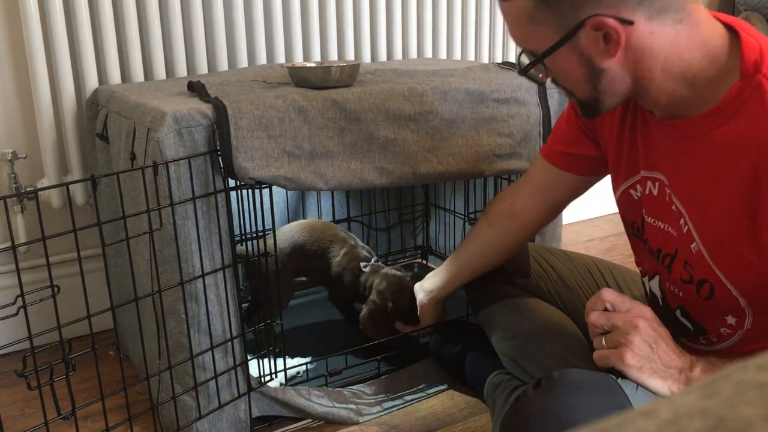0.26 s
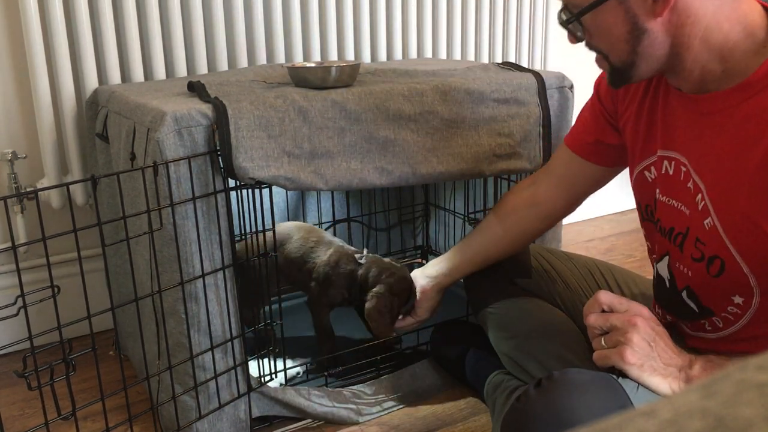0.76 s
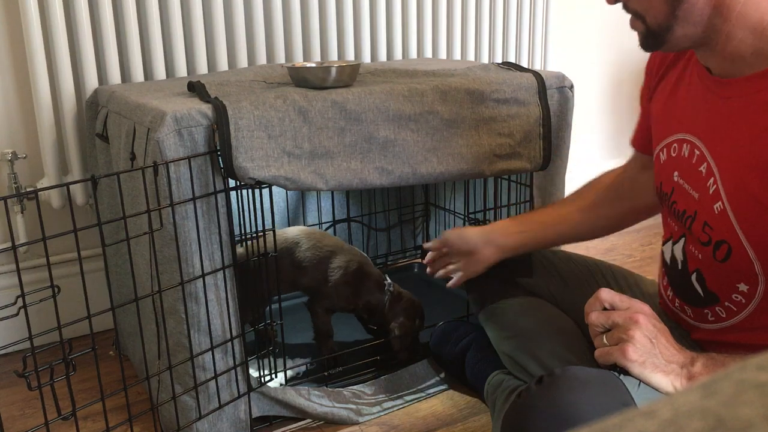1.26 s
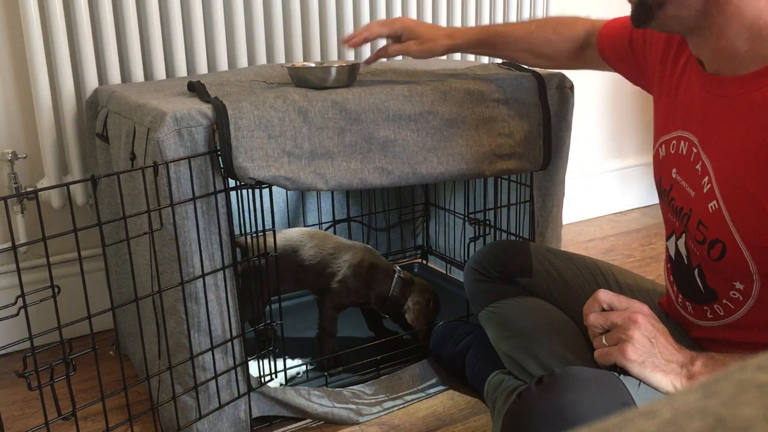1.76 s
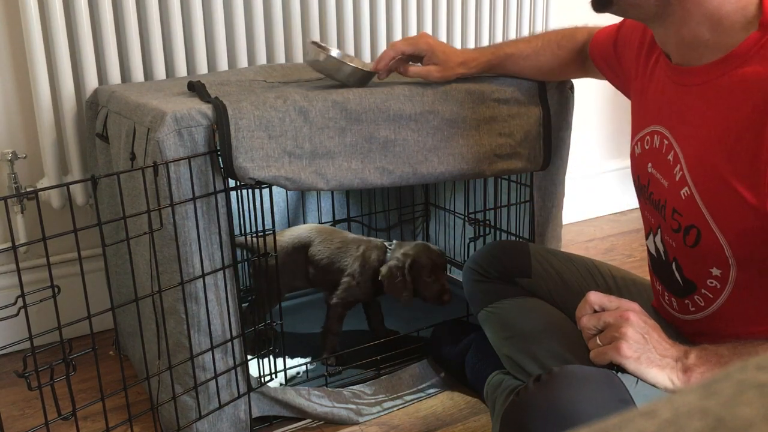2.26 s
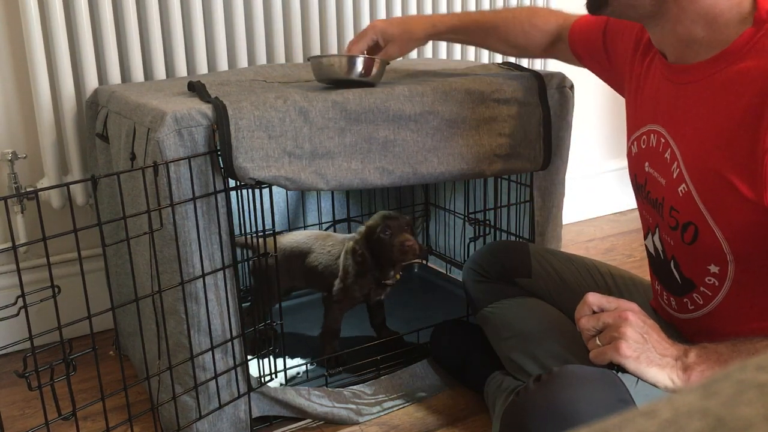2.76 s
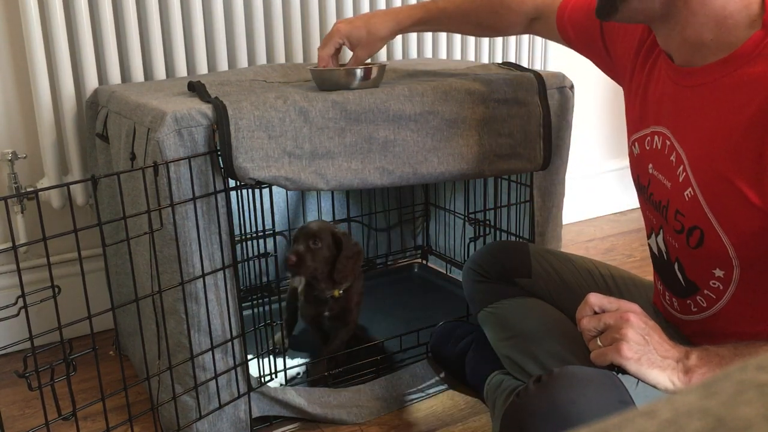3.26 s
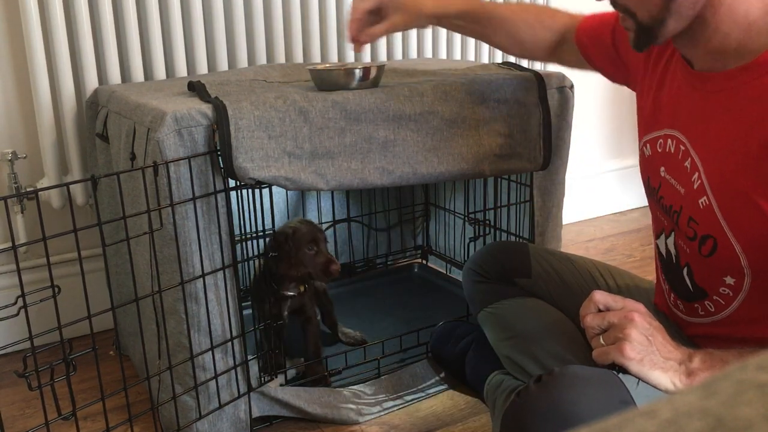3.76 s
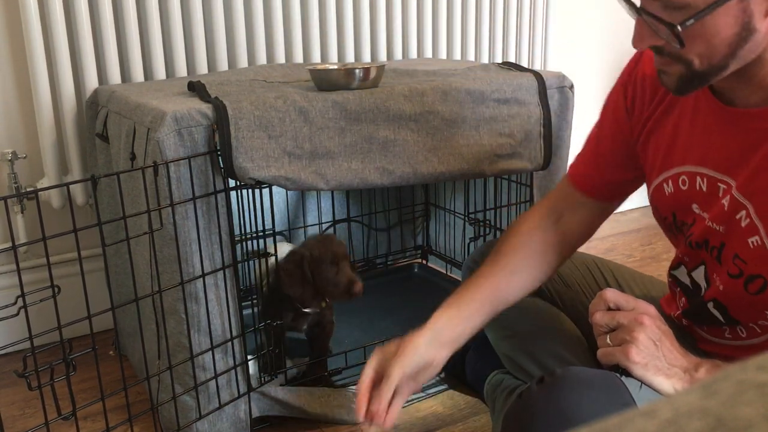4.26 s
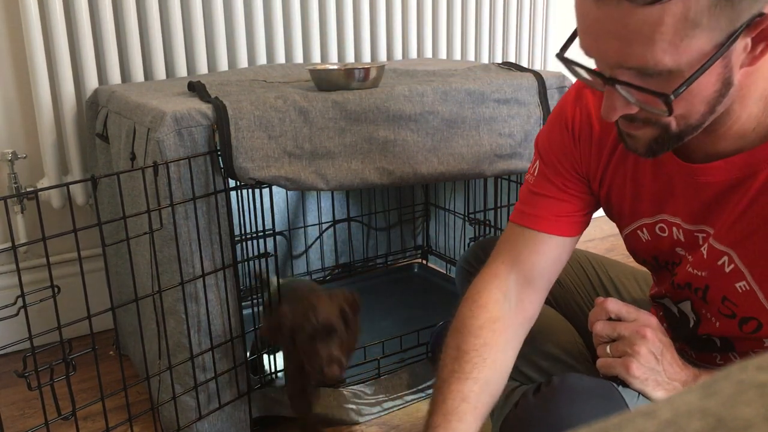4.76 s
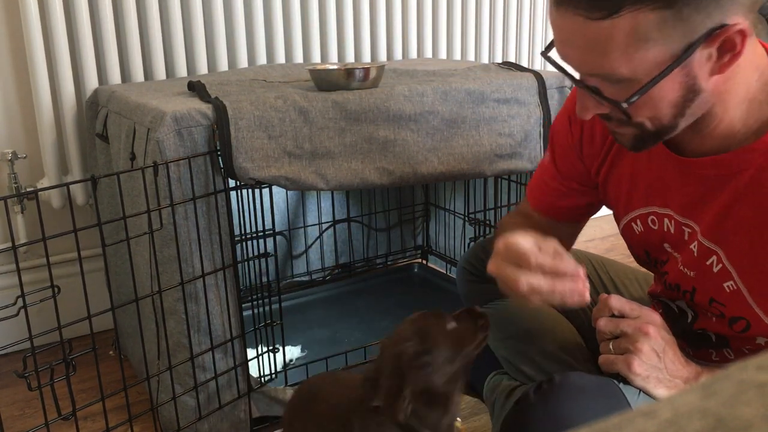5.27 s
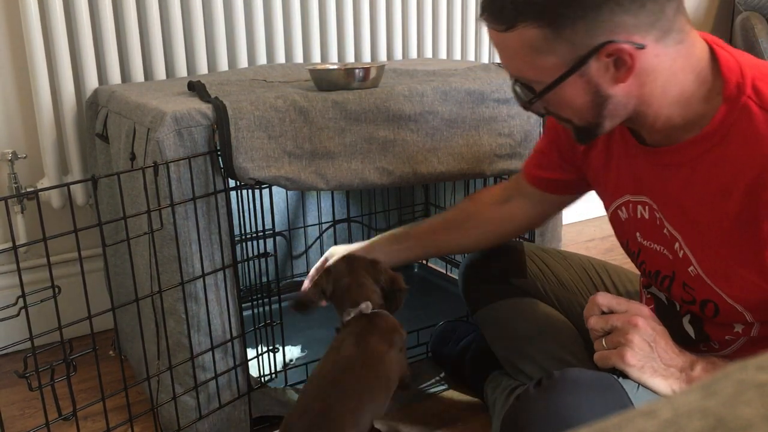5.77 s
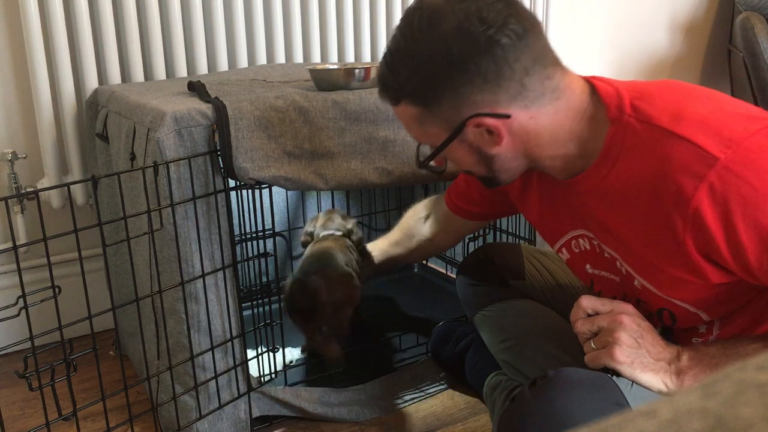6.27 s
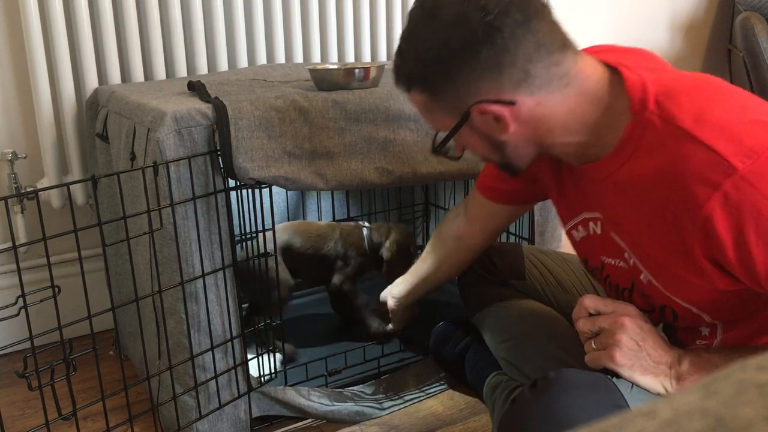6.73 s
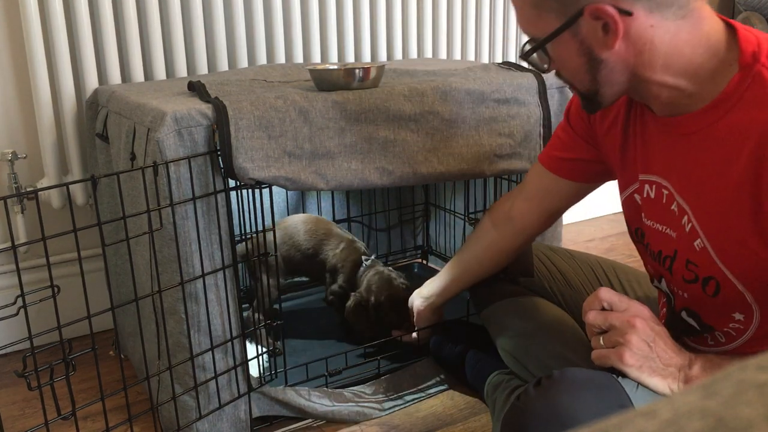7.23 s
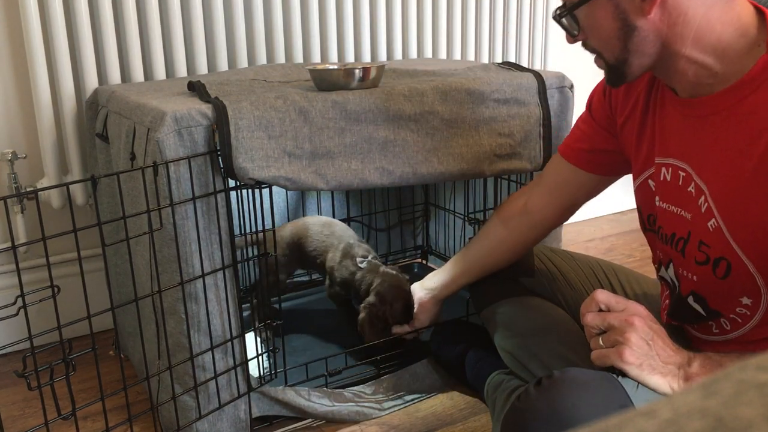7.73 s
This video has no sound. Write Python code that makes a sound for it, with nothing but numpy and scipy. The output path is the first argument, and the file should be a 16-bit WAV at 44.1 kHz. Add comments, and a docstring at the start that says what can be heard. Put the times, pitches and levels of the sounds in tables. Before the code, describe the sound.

A close microphone in a small, hard-surfaced room picks up quiet, low-weighted room noise and a faint wavering hum. Slight paw movement and a tick lead to a piercing clicker press at 0.37 s and its release at 0.56 s, bright and metallic with a short room tail. From 1 to 3.6 s things are sparse: soft paw thuds, a tiny steel bowl tap at 1.96 s, a fainter one at 2.45 s, light rustling. Around 3.9 to 4.8 s crisp claw ticks cluster with thin collar and wire pings. At 5.0 to 5.1 s paws thump and slide on the plastic tray with a tag tinkle; more ticks follow. The busiest scuffle, hollow knocks and scraping, runs 6.1 to 6.8 s, then eases to light shuffling. The clicker snaps again at 7.51 and 7.67 s, far louder than everything else, and a faint paw fall comes at 7.93 s.

```python
"""Training clicker and crated puppy

A hand-held clicker is pressed and let go twice in a small hard room: one impulse per snap rings the tongue.
Paws and claws push the plastic tray of a crate with noise bursts; slides, cloth and brushing are gated slips.
Collar tag and wire ping as decaying sines, finger taps ring a steel bowl; hum and shaped noise lie below."""
import sys
import numpy as np
from scipy import signal
from scipy.fft import rfft, irfft
from scipy.io import wavfile
from scipy.ndimage import uniform_filter1d

SR = 44100
rng = np.random.default_rng(int(sys.argv[2]) if len(sys.argv) > 2 else 0)


def generate_wav(sig):
    """Save sig (samples, or channels by samples) to the path in sys.argv[1] as 16-bit PCM at SR."""
    pcm = np.round(np.clip(np.atleast_2d(sig).T, -1, 1) * 32767).astype(np.int16)
    wavfile.write(sys.argv[1], SR, pcm)


N = 352800  # 8 s

# Background noise spectrum: f/Hz, relative density/dB
AIR_SPECTRUM = [(15, -51), (25, -19), (108, -1.5), (153, -7), (373, -16.5), (439, -14.5), (887, -25),
                (1130, -25.5), (2550, -35), (4250, -31.5), (5000, -36.5), (6380, -33), (10400, -38.5),
                (11600, -34), (16000, -50)]
# Reverberation time: f/Hz, T60/s
ROOM_T60 = [(250, 0.79), (1000, 0.5), (2000, 0.41), (4000, 0.29), (8000, 0.32), (14000, 0.14)]
# Reflections off nearby floor and walls: delay/ms, level/dB
ECHOES = [(2.3, -11), (3.6, -6), (6.8, -13), (11.2, -7), (16, -16.5)]

# Body modes, all: f/Hz, width/Hz, relative level/dB
# clicker tongue buckling in, then springing back
PRESS_MODES = [(1580, 210, -12.5), (3200, 310, -4.5), (3660, 490, 0.5), (4220, 390, 4.5), (5000, 500, -28),
               (6243, 400, -13), (6840, 830, -7), (8080, 480, -8), (9550, 600, -26), (11800, 420, -28.5),
               (12570, 910, -26.5), (16400, 700, -29)]
RELEASE_MODES = [(1714, 210, -8.5), (2430, 680, -15), (3270, 355, 3), (3493, 720, -3), (4160, 450, -5.5),
                 (6040, 365, -2), (6670, 700, -8), (7410, 210, -13.5), (7840, 440, -27.5),
                 (9250, 260, -6.5), (10970, 320, -14.5), (12580, 98, -6), (14700, 1100, -20),
                 (16100, 500, -29)]
# tray: low boom, higher drumming
TRAY_BOOM_MODES = [(191, 50, 2), (229.2, 30, 0), (273, 21, 1), (377.8, 49, -8)]
TRAY_DRUM_MODES = [(560, 390, -6), (744, 57, 0), (897, 33, -3), (1110, 120, 0), (1240, 190, -4.5),
                   (1544, 200, -6), (1984, 230, -8.5)]
# claws on the tray
CLAW_MODES = [(2013, 450, 2.5), (2970, 330, 3), (3770, 2900, -1.5)]
# collar metal
COLLAR_MODES = [(9340, 540, -1), (12510, 670, -6), (11100, 6400, -9.5)]
# cloth and fur weave
CLOTH_MODES = [(6640, 3000, -4), (9560, 1300, 0.5), (13390, 3800, -7.5)]
# metal brushed by fingers and fur
BRUSHED_MODES = [(3250, 560, 6), (6300, 2600, 0.5)]
# steel food bowl
BOWL_MODES = [(4940, 25, 2), (6350, 25, -0.5), (7650, 30, -6), (8800, 30, 1)]

# Paws sliding on the tray: t/s at full strength, hold/s, boom level/dB, brightness/dB
SLIDES = [(0.0, 0.03, -60.5, 5), (0.344, 0.021, -59.5, 6.5), (1.399, 0.16, -69.5, -6.5),
          (2.015, 0.025, -46.5, -11), (2.909, 0.047, -53, -3.5), (3.134, 0.09, -62.5, -3),
          (3.4, 0.037, -55, -5), (3.7, 0.094, -70, -6), (4.274, 0.095, -63.5, -10.5),
          (4.54, 0.036, -55.5, 1), (4.794, 0.034, -52, -3.5), (5.037, 0.065, -38.5, -5),
          (5.607, 0.031, -67.5, 8), (6.13, 0.27, -45.5, 1.5), (6.26, .02, -49, 6),
          (6.308, 0.022, -40.5, -0.5), (6.544, .03, -60, -11), (6.66, 0.018, -46, -0.5),
          (6.763, 0.13, -58, 2.5), (7.125, 0.08, -60, -1), (7.37, 0.26, -63, 1.5)]
# Cloth and fur rustles: t/s at full strength, hold/s, level/dB
RUSTLES = [(0.0, 0.15, -62), (0.295, 0.15, -64), (1.23, .1, -67), (1.797, 0.047, -73.5),
           (2.45, 0.092, -76.5), (2.916, 0.035, -71), (3.593, 0.061, -72), (4.11, .04, -72),
           (4.45, 0.038, -70), (4.8, 0.02, -60.5), (5.058, 0.022, -44.5), (5.63, 0.12, -73),
           (6.132, 0.013, -50), (6.347, 0.07, -55), (6.75, 0.08, -62), (6.989, .05, -57.5),
           (7.3, 0.19, -67.5)]
# Brushing along metal: t/s at full strength, hold/s, level/dB
BRUSHES = [(3.605, 0.047, -62), (5.87, 0.034, -59.5)]
# Thin pings of collar tag and crate wire: t/s, f/Hz, nominal level/dB, T60/s
PINGS = [(3.903, 9340, -62, 0.079), (4.156, 9580, -51, 0.087), (4.156, 12600, -55, 0.12),
         (4.288, 9060, -47, 0.04), (4.289, 6280, -42, 0.038), (5.04, 8550, -39, 0.19),
         (5.535, 10000, -53, 0.16), (5.664, 4750, -61, 0.26), (6.491, 11850, -57, 0.29)]
# Finger taps on the bowl: t/s, peak level/dB before the paw gains
BOWL_TAPS = [(1.9604, -47.5), (2.455, -60)]
# Bright claw and finger ticks: t/s, claw level/dB, claw f/Hz, knock level/dB, collar level/dB
TICKS = [(0.3225, -34, 6400, -35.5, -38.5), (1.9604, -48, 6360, -42.5, -49.5),
         (2.2187, -60.5, 6210, -71.5, -48.5), (2.942, -62, 6500, -70, -46), (3.141, -44.5, 6970, -45, -48),
         (3.495, -60, 6040, -70, -60), (3.901, -38, 6600, -43.5, -44), (4.002, -49.5, 6240, -75, -53),
         (4.0227, -29.5, 6600, -36, -45), (4.154, -37, 6940, -39.5, -47), (4.275, -49.5, 6900, -64, -52),
         (4.288, -48, 6600, -40.5, -61), (4.4206, -41, 3050, -45.5, -43.5), (4.573, -34.5, 6200, -44, -53),
         (4.7108, -28.5, 6360, -37.5, -45), (4.7605, -34.5, 3870, -37, -55), (5.1392, -31, 7300, -41, -39),
         (5.497, -54, 6250, -69, -58), (5.619, -46.5, 6050, -63.5, -53), (5.5339, -38, 3230, -42, -37),
         (5.6644, -38.5, 5500, -44, -48), (5.8007, -42.5, 6900, -60, -48), (5.9264, -51, 6200, -79, -47),
         (5.95, -50, 6500, -59, -51), (6.0774, -35, 6730, -31.5, -52), (6.1152, -37.5, 6400, -48, -34)]
# Time constants of a tick: rise/ms, claw decay/ms, tray decay/ms
TICK_MS = (1.8, 5.07, 8.2)
# Duller paw falls loading the tray: t/s, claw level/dB, thud level/dB, knock level/dB, knock f/Hz
PAWFALLS = [(0.175, -44.5, -43, -43, 920), (1.1413, -53.5, -58, -61, 350), (2.032, -59, -50, -54, 490),
            (2.7603, -53.5, -39, -47.5, 355), (2.9046, -43.5, -48, -51, 780),
            (2.9491, -55, -43.5, -50, 380), (3.1033, -50, -63.5, -46, 920), (3.3541, -52, -44, -51, 1156),
            (3.457, -77, -47, -63, 356), (3.5926, -48, -62, -50, 413), (4.4446, -48, -65, -52, 590),
            (4.9805, -37.5, -35, -36, 895), (5.0306, -36.5, -34.5, -37, 345), (5.137, -45, -25, -38, 353),
            (5.44, -53.5, -40.5, -38.5, 370), (5.6192, -52, -41, -44, 460), (5.808, -59, -39, -39, 530),
            (6.2202, -34.5, -48, -62, 590), (6.2583, -44, -34.5, -31.5, 1140),
            (6.2965, -27, -25, -23, 1180), (6.4497, -38, -41.5, -30, 779), (6.4827, -40, -32, -38, 900),
            (6.6127, -28, -30.5, -24, 820), (6.6393, -53, -33, -26.5, 930),
            (7.061, -49.5, -41, -43.5, 1043), (7.414, -49, -50, -49.5, 1010), (7.929, -49, -46, -46.5, 689)]
# Time constants of a paw fall: rise/ms, claw decay/ms, tray decay/ms
PAW_MS = (1.7, 7, 16.3)
# Clicker snaps, press and release in turn: t/s, direct peak level/dB, pitch factor set by the grip
SNAPS = [(0.3680, -3.5, 1), (0.5613, -6, 1.005), (7.5054, -3.5, 1.013), (7.6704, -6, 1.017)]

AIR_DB, AIR_SWELL_DB = -58, 1.1
HUM_HZ, HUM_WANDER_HZ, HUM_DB, HUM_WAVER_DB = 98, 1.5, -62.5, 3
DEEP_HZ, DEEP_DB = 56.7, -64  # low room mode
MID_HZ, MID_DB = 289.7, -69.5  # higher room mode

DRUM_DB, SCRAPE_DB = -1, -7  # re boom, before brightness
SLIDE_RISE_DB_S, SLIDE_FALL_DB_S = 260, 89.5
RUSTLE_RISE_DB_S, RUSTLE_FALL_DB_S = 260, 95
BRUSH_RISE_DB_S = 400

TICK_KNOCK_HZ, TICK_THUD_DB = 597, -7.5  # thud re knock
PAW_CLAW_HZ, PAW_COLLAR_DB = 1800, -20.5  # collar re claw
PAW_DRY_DB, PAW_ROOM_DB = -7.5, -8.5  # paws past the room, paws into the room

ROOM_DB, ROOM_BUILD_MS = -1, 1.6  # tail energy, build-up
NEAR_DB, NEAR_MS = -4, 4  # scatter off hand, crate and floor
HALL_DB, HALL_STRETCH = -17.5, 3.4  # slower tail of the adjoining space, re room tail
LOW_CUT_HZ, TOP_HZ = 42, 16000


def undb(db):
    """Amplitude factor of a level in dB."""
    return 10 ** (np.asarray(db) / 20)


def unit(x):
    """Scale to rms 1."""
    return x / np.sqrt(np.mean(x ** 2))


def walk(rate_hz):
    """Random levels held 1 / rate_hz, smoothed twice; spread near 1."""
    hold = int(SR / rate_hz)
    steps = np.repeat(rng.standard_normal(N // hold + 1), hold)
    return 1.5 * uniform_filter1d(uniform_filter1d(steps, hold), hold)[:N]


def body(modes):
    """Impulse response of damped modes, energy 1; neighbours swing in opposite sense."""
    t = np.arange(SR // 10) / SR
    h = np.zeros(len(t))
    for k, (hz, width_hz, db) in enumerate(modes):
        decay = np.exp(-np.pi * width_hz * t)
        h += (-1) ** k * undb(db) * width_hz / hz * decay * np.sin(2 * np.pi * hz * t)
    h = np.diff(h, prepend=0)  # small bodies radiate by their motion: little below the modes
    return h / np.sqrt(np.sum(h ** 2))


def ring(force, modes):
    """Drive a body with a force."""
    return signal.fftconvolve(force, body(modes))[:N]


def grains(scatter_db, rate_hz):
    """Noise broken into little slips of uneven size."""
    return unit(rng.standard_normal(N) * undb(scatter_db * walk(rate_hz)))


def swell(s, hold_s, db, rise_db_s, fall_db_s):
    """Strength of overlapping strokes: each rises, holds and dies away; their powers add."""
    t = np.arange(0, N, 64) / SR
    late = t[:, None] - s
    down_db = rise_db_s * np.maximum(-late, 0) + fall_db_s * np.maximum(late - hold_s, 0)
    strength = np.sqrt(np.sum(undb(db - down_db) ** 2, axis=1))
    return np.interp(np.arange(N) / SR, t, strength)


def push(rise_ms, fall_ms):
    """Force envelope of one contact: exponential rise and decay."""
    ms = np.arange(SR // 6) / SR * 1000
    return (1 - np.exp(-ms / rise_ms)) * np.exp(-ms / fall_ms)


def air():
    """Gently swelling shaped noise, two noise-driven room modes and a wavering mains hum."""
    hz = np.maximum(np.arange(N // 2 + 1) * SR / N, 1)
    table_hz, table_db = np.array(AIR_SPECTRUM).T
    shape = undb(np.interp(np.log(hz), np.log(table_hz), table_db))
    noise = unit(irfft(rfft(rng.standard_normal(N)) * shape, N))
    rumble = noise * undb(AIR_DB + AIR_SWELL_DB * walk(5.3))
    hum_phase = 2 * np.pi * np.cumsum(HUM_HZ + HUM_WANDER_HZ * walk(1.8)) / SR
    hum = np.sqrt(2) * np.sin(hum_phase) * undb(HUM_DB + HUM_WAVER_DB * walk(5.4))
    deep = ring(rng.standard_normal(N), [(DEEP_HZ, 15, 0)]) * undb(DEEP_DB)
    mid = ring(rng.standard_normal(N), [(MID_HZ, 30, 0)]) * undb(MID_DB)
    return rumble + deep + mid + hum


def scuffle():
    """Sliding paws, cloth and brushing: uneven slips drive tray, claws, weave and metal."""
    s, hold_s, boom_db, bright_db = np.array(SLIDES).T

    def slide(db):
        return swell(s, hold_s, db, SLIDE_RISE_DB_S, SLIDE_FALL_DB_S)

    rustle = swell(*np.array(RUSTLES).T, RUSTLE_RISE_DB_S, RUSTLE_FALL_DB_S)
    brush = swell(*np.array(BRUSHES).T, BRUSH_RISE_DB_S, RUSTLE_FALL_DB_S)
    out = ring(slide(boom_db) * grains(2.5, 30), TRAY_BOOM_MODES)
    out += ring(slide(boom_db + DRUM_DB + bright_db) * grains(2.5, 60), TRAY_DRUM_MODES)
    out += ring(slide(boom_db + SCRAPE_DB + bright_db) * grains(3, 80), CLAW_MODES)
    out += ring(rustle * grains(3.5, 90), CLOTH_MODES)
    out += ring(brush * grains(2, 90), BRUSHED_MODES)
    return out


def pings():
    """Single lightly damped modes, each struck once."""
    out, t = np.zeros(N), np.arange(SR // 2) / SR
    for s, hz, db, t60_s in PINGS:
        envelope = np.exp(-np.log(1000) * t / t60_s) * (1 - np.exp(-t / 0.0011))
        i = int(s * SR)
        out[i:i + len(t)] += undb(db) * envelope * np.sin(2 * np.pi * hz * t)
    return out * undb(1.6 * walk(150))  # loose metal keeps touching its neighbours: flutter


def bowl():
    """Impulsive finger taps ring the steel bowl."""
    taps, peak = np.zeros(N), np.max(np.abs(body(BOWL_MODES)))
    for s, db in BOWL_TAPS:
        taps[int(s * SR)] = undb(db) / peak
    return ring(taps, BOWL_MODES)


def contacts():
    """A rough push ticks a claw and shakes the collar; the loose tray thuds and rattles on for longer."""
    out = np.zeros(N + SR)
    boom, collar = body(TRAY_BOOM_MODES), body(COLLAR_MODES)
    rows = []
    for s, claw_db, claw_hz, knock_db, collar_db in TICKS:
        thud_db = knock_db + TICK_THUD_DB
        rows.append((s, claw_db, claw_hz, thud_db, knock_db, TICK_KNOCK_HZ, collar_db, *TICK_MS))
    for s, claw_db, thud_db, knock_db, knock_hz in PAWFALLS:
        collar_db = claw_db + PAW_COLLAR_DB
        rows.append((s, claw_db, PAW_CLAW_HZ, thud_db, knock_db, knock_hz, collar_db, *PAW_MS))
    for s, claw_db, claw_hz, thud_db, knock_db, knock_hz, collar_db, rise_ms, tick_ms, tray_ms in rows:
        rattle = push(2.9 * rise_ms, tray_ms)
        drag = undb(-16) * push(12.0, 3 * tray_ms)  # faint scrape as the contact drags on
        tick = push(rise_ms, tick_ms) + drag
        knock = body([(knock_hz, 0.44 * knock_hz, 0), (1.304 * knock_hz, 0.87 * knock_hz, -4)])
        claw = body([(claw_hz, 0.21 * claw_hz, 0), (3000, 4000, -7)])
        gains = undb([[thud_db], [knock_db], [claw_db], [collar_db]])
        force = np.array([rattle, rattle, tick, tick]) * gains
        force = force * rng.standard_normal(force.shape)
        bodies = np.array([boom, knock, claw, collar])
        sound = signal.fftconvolve(force, bodies, axes=1).sum(axis=0)
        i = int(s * SR)
        out[i:i + len(sound)] += sound
    return out[:N]


def clicker():
    """Each snap is one sharp force on the tongue; press and release ring different modes."""
    out = np.zeros(N)
    for k, (s, db, pitch) in enumerate(SNAPS):
        modes = (PRESS_MODES, RELEASE_MODES)[k % 2]
        h = body([(hz * pitch, width_hz, mode_db) for hz, width_hz, mode_db in modes])
        i = int(s * SR)
        out[i:i + len(h)] += undb(db) * h / np.max(np.abs(h))
    return out


def room(x):
    """Direct sound, close scatter, distinct echoes and a dense tail with frequency-dependent decay."""
    t = np.arange(SR) / SR
    tail = np.zeros(len(t))
    edges_hz = 125 * 2 ** np.arange(0, 7.6, .5)  # half octaves
    table_hz, table_s = np.array(ROOM_T60).T
    for lo, hi in zip(edges_hz[:-1], edges_hz[1:]):
        t60_s = np.interp(np.log(lo * hi) / 2, np.log(table_hz), table_s)
        sos = signal.butter(2, [lo, min(hi, 20000)], "bandpass", fs=SR, output="sos")
        band = signal.sosfilt(sos, rng.standard_normal(len(t)))
        decay = np.exp(-np.log(1000) * t / t60_s)
        hall = undb(HALL_DB) * np.exp(-np.log(1000) * t / (HALL_STRETCH * t60_s))
        tail += band * (decay + hall)
    tail *= 1 - np.exp(-t * 1000 / ROOM_BUILD_MS)
    near = rng.standard_normal(len(t)) * np.exp(-t * 1000 / NEAR_MS) * (t > .001)
    h = tail * undb(ROOM_DB) / np.sqrt(np.sum(tail ** 2))
    h += near * undb(NEAR_DB) / np.sqrt(np.sum(near ** 2))
    h[0] = 1  # direct sound
    for ms, db in ECHOES:
        h[int(ms * SR / 1000)] += undb(db)
    return signal.fftconvolve(x, h)[:N]


def scene():
    """Clicker and, more weakly, paws and metal go through the room; part of the latter stays dry."""
    paws = contacts() + pings() + bowl()
    wet = room(clicker() + undb(PAW_ROOM_DB) * paws)
    return (air() + scuffle() + undb(PAW_DRY_DB) * paws + wet)[None]


def record(dry):
    """High-pass the deepest bass, then cut the top steeply."""
    high_pass = signal.butter(3, LOW_CUT_HZ, "highpass", fs=SR, output="sos")
    low_pass = signal.ellip(8, .2, 70, TOP_HZ, fs=SR, output="sos")  # 0.2 dB ripple, 70 dB stop
    return signal.sosfilt(low_pass, signal.sosfilt(high_pass, dry))


dry = scene()
out = record(dry)
generate_wav(out)
```